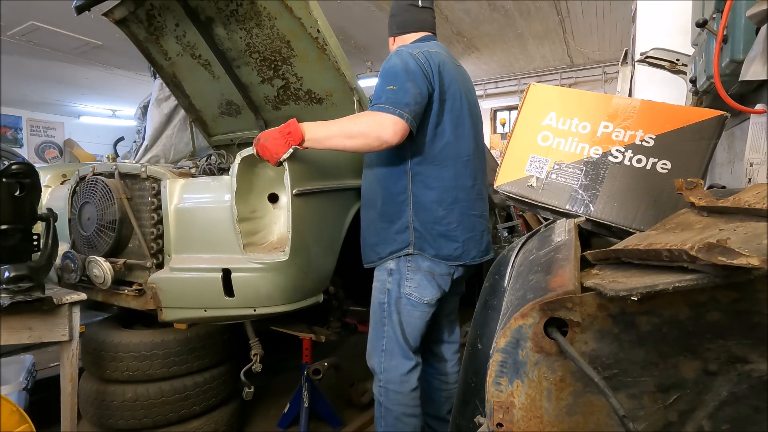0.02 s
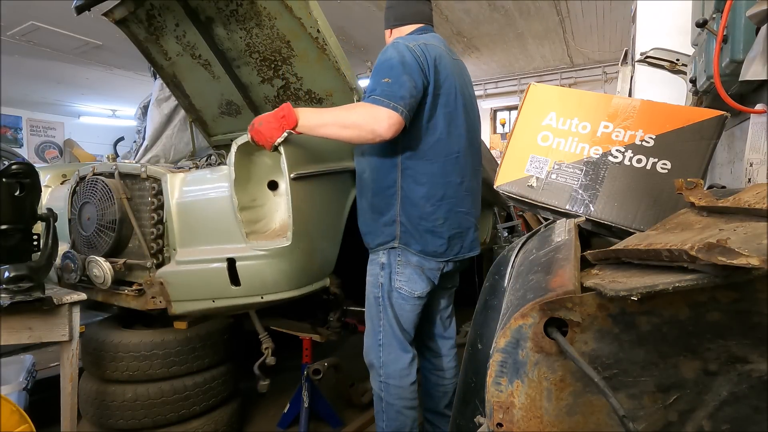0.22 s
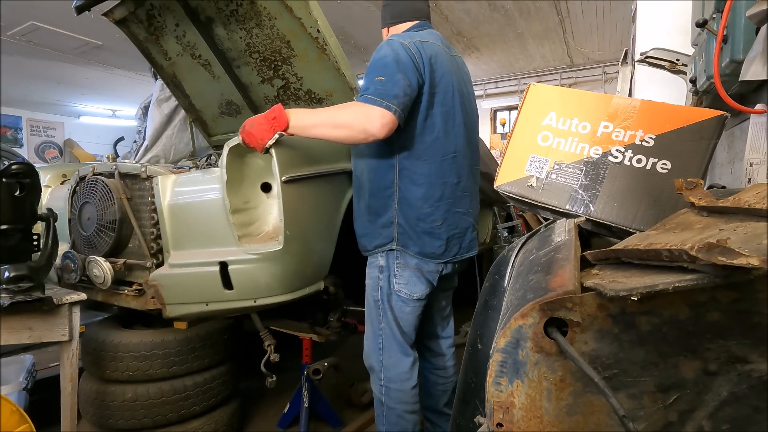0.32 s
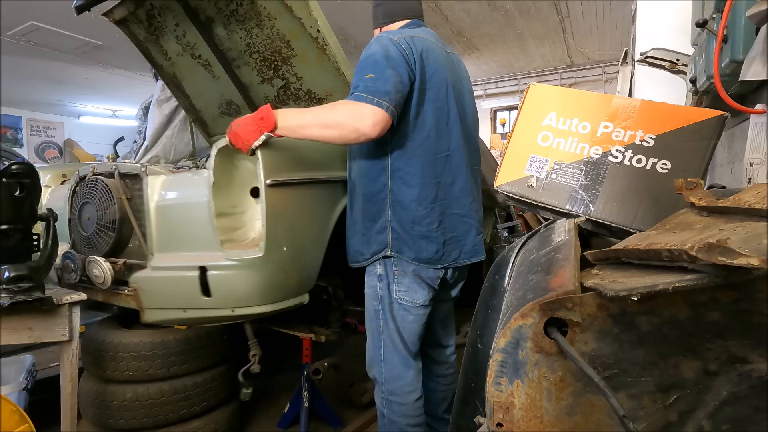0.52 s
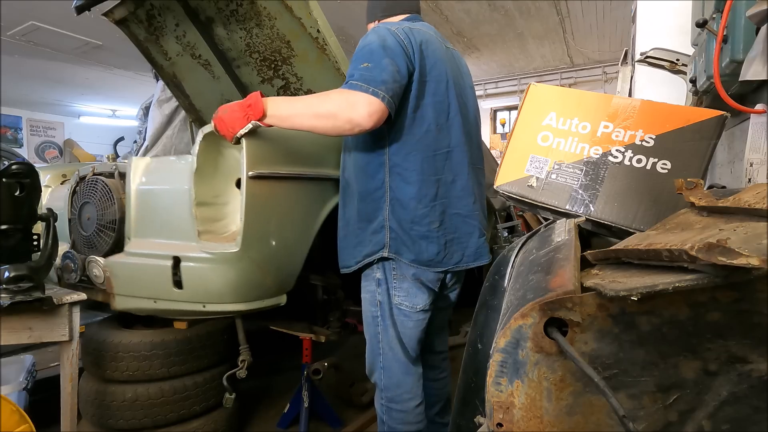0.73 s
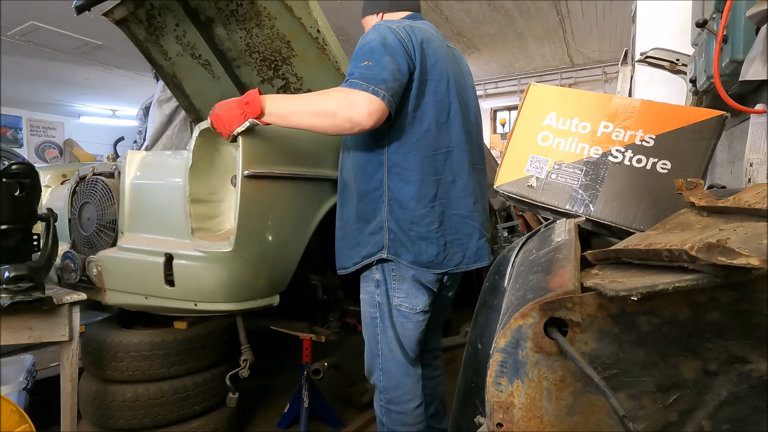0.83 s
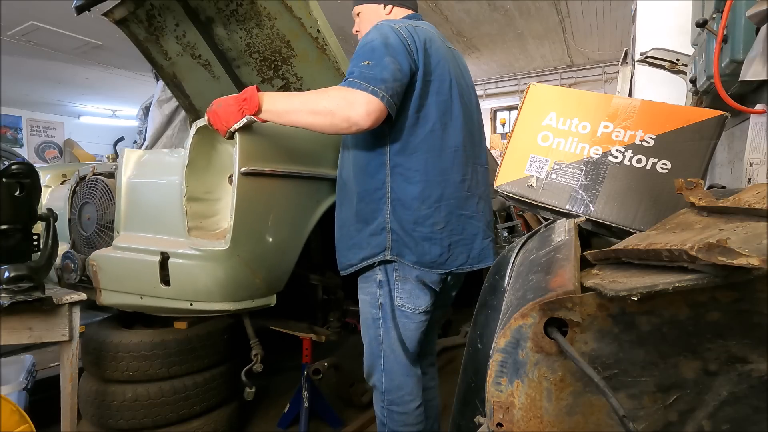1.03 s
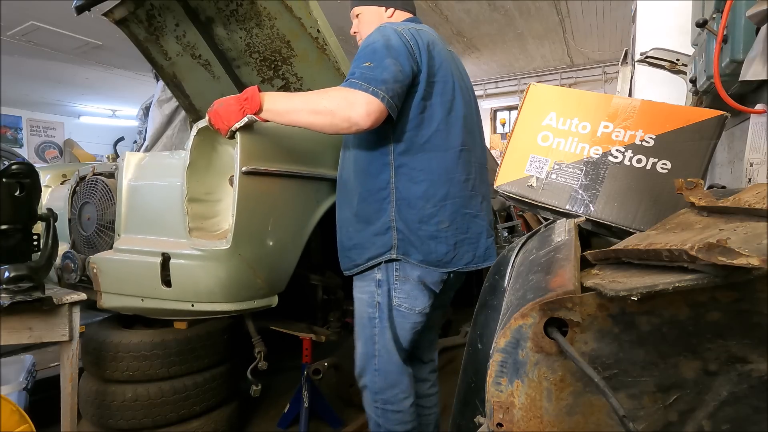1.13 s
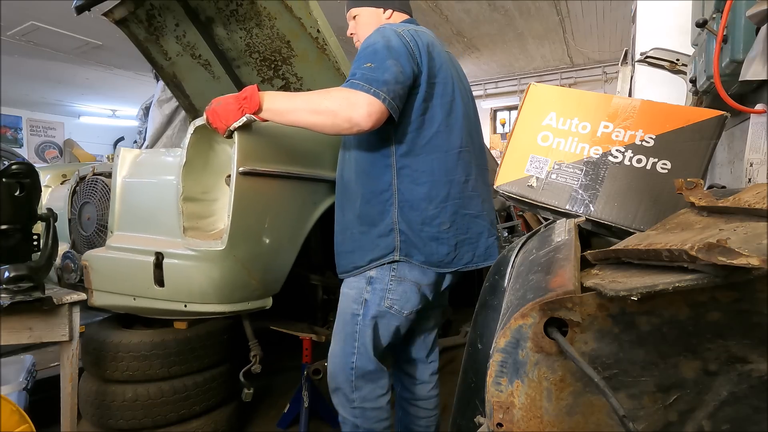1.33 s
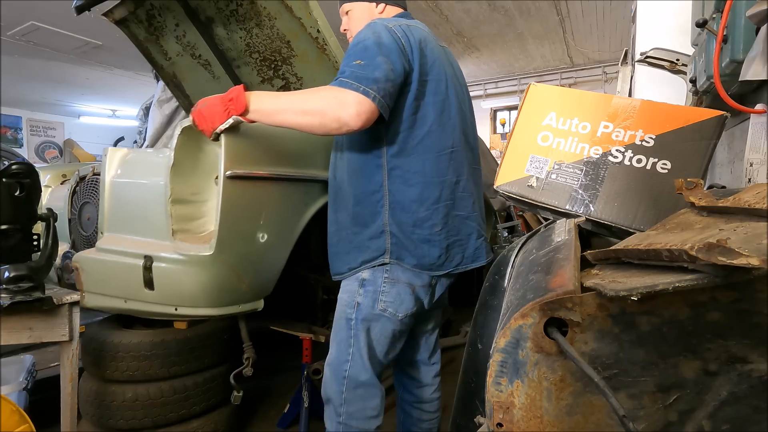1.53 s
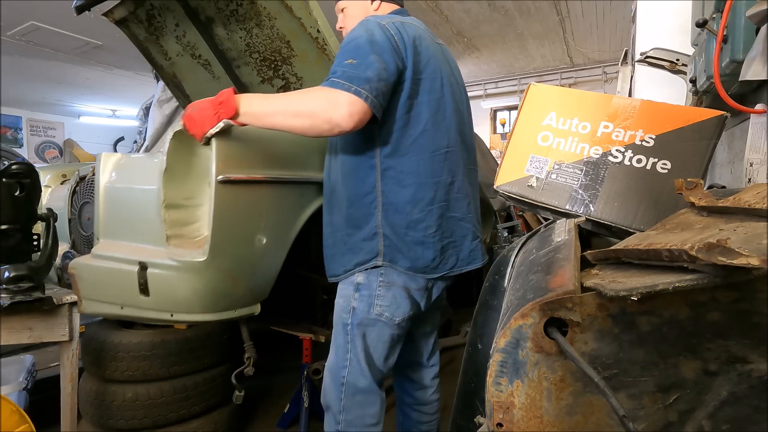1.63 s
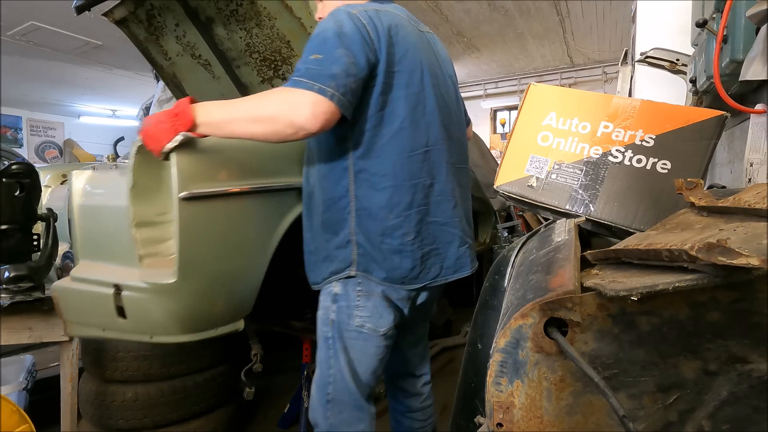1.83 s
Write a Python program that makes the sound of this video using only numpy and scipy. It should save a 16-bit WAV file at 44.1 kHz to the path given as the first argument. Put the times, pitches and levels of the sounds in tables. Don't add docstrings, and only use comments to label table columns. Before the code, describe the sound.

A loose sheet-steel car fender bangs twice, booming and ringing, then faint ticks in a garage

```python
import sys
import numpy as np
from scipy import signal
from scipy.fft import rfft, irfft, next_fast_len
from scipy.io import wavfile
from scipy.ndimage import map_coordinates

SR = 44100
rng = np.random.default_rng(int(sys.argv[2]) if len(sys.argv) > 2 else 0)


def decibels_to_gain(level_db):
    exponent = np.asarray(level_db, float) / 20
    return 10 ** exponent


def unload_audio(sound):
    columns = np.transpose(np.atleast_2d(sound))
    steps = np.round(np.clip(columns, -1, 1) * 32767)
    wavfile.write(sys.argv[1], SR, steps.astype(np.int16))


N = 83790


def unit(x):
    return x / np.sqrt(np.mean(x ** 2) + 1e-20)


def along(points, hz):
    f, value = np.transpose(points)
    return np.interp(np.log(hz + 1), np.log(f + 1), value)


def wobble(rate, size=N):
    knots = rng.standard_normal(int(size * rate / SR) + 4)
    return map_coordinates(knots, [np.arange(size) * rate / SR])


def filtered(x, response):
    n = x.shape[-1]
    m = next_fast_len(n + SR // 4)
    return irfft(rfft(x, m) * response(np.fft.rfftfreq(m, 1 / SR)), m)[..., :n]


def resonance(f, hz, width):
    return 1j * f * width / (hz * hz - f * f + 1j * f * width)


def hump(hz, octaves):
    return lambda f: resonance(f, hz, hz * octaves) ** 2


def add(track, s, x):
    x = x[max(-round(s * SR), 0):]
    part = track[max(round(s * SR), 0):][:len(x)]
    part += x[:len(part)]


# f/Hz, side over mid [ratio]
WIDE = [(100, .04), (500, 0.44), (3000, 0.59), (12000, 0.4)]


def spread(pair):
    side = filtered(pair[1], lambda hz: along(WIDE, hz))
    return np.array([pair[0] + side, pair[0] - side])


# multiple of its turning rate [-], rms level/dB
SHAFT_HUM = [(6, -58), (7, -65), (8, -66), (9, -70), (10, -69), (11, -58.5), (12, -63), (14, -68),
             (16, -71), (21, -80), (23, -84)]
# f/Hz, level/dB
AIR_COLOUR = [(25, -33.5), (75, -21), (115, -17), (150, -10.5), (300, -13.5), (410, -18), (450, -24),
              (800, -33), (6500, -41), (14500, -54)]


def heater():
    motor_hz, waver = 25.7, .001
    turns = np.cumsum(motor_hz * (1 + waver * wobble(3))) / SR
    hum = np.zeros(N)
    for multiple, db in SHAFT_HUM:
        level = np.sqrt(2) * decibels_to_gain(db + 2 * wobble(9))
        hum += level * np.sin(2 * np.pi * (multiple * turns + rng.random()))
    air = filtered(rng.standard_normal((2, N)), lambda hz: decibels_to_gain(along(AIR_COLOUR, hz)))
    air_db = -58
    return hum + decibels_to_gain(air_db) * spread(air / air[0].std())


def bending_modes(rows, grips):
    sound, t = np.zeros(N), np.arange(SR // 2) / SR
    swell_cycles, min_swell_s, longest_t60_s = 0.42, 0.0026, .7
    for s, db, hz, t60 in rows:
        swell = 1 - np.exp(-t / max(swell_cycles / hz, min_swell_s))
        loss_db = 60 * t / min(t60, longest_t60_s)
        for grip_s, rate in grips:
            if s < grip_s:
                loss_db = loss_db + rate * np.maximum(s + t - grip_s, 0)
        shake = .3 * wobble(40, size=len(t))
        add(sound, s, decibels_to_gain(db - loss_db) * swell * np.sin(2 * np.pi * hz * t + shake))
    return sound


# t/s, peak level/dB, f/Hz, t60/s
BOOMS = [(.001, -43.5, 44.6, 0.16), (0.091, -45, 45.3, 0.56), (0.159, -40, 61.4, 0.23),
         (.17, -36, 152, 0.32), (.03, -52.5, 92.9, 0.3), (.195, -44.5, 97.4, 0.34), (.21, -44.5, 50, 0.34),
         (.249, -22.5, 137, 0.41), (.26, -13, 164.1, 0.81), (.272, -23, 97.7, 1), (.275, -27.5, 343, 0.09),
         (0.269, -23, 56.4, 0.28), (.3, -21, 217.5, 0.49), (.336, -25.5, 226, 0.52),
         (0.335, -18, 103.1, 0.64), (.34, -25.5, 45, .3), (.355, -18.5, 142.9, 0.87),
         (.485, -32, 122.9, 0.17), (.39, -18.5, 69.5, 0.5), (0.399, -20.5, 228.1, 0.22),
         (.424, -23, 180.2, 0.4), (0.439, -21, 59.26, 0.14), (.49, -25.5, 224.3, 0.19),
         (.52, -33.5, 149.4, 0.28), (.54, -30.5, 97.6, 0.2), (.575, -35.5, 227.3, 0.44),
         (.6, -34.5, 48.5, 0.27), (.637, -31.5, 148.1, 0.17), (0.645, -32, 74.3, 0.24),
         (.68, -52.5, 230, 0.36), (.7, -46.5, 105, 0.22), (.715, -43, 147.7, 0.14),
         (0.738, -34, 58.7, 0.28), (.785, -47, 218, 0.21), (.79, -41, 140.6, 0.14),
         (0.801, -40.5, 99.2, 0.38), (.85, -40, 60.7, 0.3), (.855, -47, 153.4, 0.23),
         (.878, -40.5, 80.3, 0.27), (.94, -38.5, 55.9, 0.19), (1.18, -52.5, 59.4, 0.23),
         (1.323, -39.5, 66.4, 0.13), (1.324, -42, 126.5, 0.24), (1.364, -35.5, 66.4, 0.089),
         (1.79, -54.5, 75, 0.16)]
# t/s, extra loss [dB per s]
PANEL_GRIPS = [
    (.333, 250),
    (.465, 200),
]


def panel_booms():
    return bending_modes(BOOMS, PANEL_GRIPS)


def gritty_bursts(rows):
    edge, t = np.zeros(N), np.arange(SR // 4) / SR
    grit_db, grit_per_s, fall_over_rise = 2, 500, 1.855
    for s, db, rise, hz, octaves in rows:
        rough = rng.standard_normal(len(t)) * decibels_to_gain(grit_db * wobble(grit_per_s, size=len(t)))
        grit = unit(filtered(rough, hump(hz, octaves)))
        u = t / rise - 2
        shape = np.where(u < 0, np.exp(-u * u), np.exp(-u / fall_over_rise))
        add(edge, s - 2 * rise, decibels_to_gain(db) * grit * shape)
    return edge


# t/s of the peak, level/dB, rise/s, f/Hz of the centre, width/octaves
BANGS = [(.01, -53, 0.041, 1810, 4.4), (0.089, -42, 0.03, 2780, 1.7), (.084, -48, 0.016, 3700, 0.16),
         (.095, -45, 0.021, 2000, 0.38), (.085, -49.5, .015, 610, 1.2), (.124, -49.5, 0.0072, 790, .6),
         (0.139, -57.5, 0.0074, 3000, 0.89), (0.198, -41, 0.017, 990, 3.7), (0.233, -41, 0.019, 680, 3.7),
         (.249, -26, .002, 600, 1.5), (.255, -21, 0.004, 1300, .8), (0.269, -18.5, 0.006, 1530, 1.2),
         (.283, -17.5, 0.011, 2655, 3), (.29, -22, .015, 499, 2.4), (.284, -24, .008, 6980, 0.033),
         (.288, -25.5, .005, 4120, .06), (.279, -24.5, .004, 5365, 0.049), (0.313, -37, 0.0041, 6920, .06),
         (0.314, -28, 0.0082, 2850, 0.98), (0.336, -30.5, 0.0085, 2430, 1.5), (.34, -24.5, 0.023, 420, 1.6),
         (.365, -22, 0.0043, 3010, 1.4), (.371, -22, .009, 1297, 0.81), (.378, -28, 0.0078, 2180, 0.62),
         (.28, -27.5, .012, 1006, 0.42), (.385, -26.5, 0.0096, 715, 1.3), (.418, -41, 0.0061, 1230, 0.39),
         (.444, -35, .006, 1190, 0.41), (.54, -46.5, 0.032, 1300, 1), (0.481, -45.5, 0.027, 505, 1.1),
         (0.599, -55, 0.044, 3970, 1.14), (0.701, -49, 0.068, 1080, 1.84)]


def scrapes_and_bangs():
    return gritty_bursts(BANGS)


# t/s, peak level/dB, f/Hz of the centre, width/octaves
KNOCKS = [
    (.2464, -11, 1500, .5),
    (.2466, -17, 600, .7),
    (.2486, -14, 1000, .6),
    (.2595, -15, 520, .8),
    (.272, -14, 1800, .7),
    (.3755, -14, 1400, .5),
]


def knocks():
    edge, t = np.zeros(N), np.arange(SR // 4) / SR
    for s, db, hz, octaves in KNOCKS:
        blow = filtered(1. * (t == 0), hump(hz, octaves))
        add(edge, s, decibels_to_gain(db) * blow / np.abs(blow).max())
    return edge


BLOW_S = [.247, .272, .36, .385, .455]
# peak level/dB, f/Hz, t60/s
RINGS = [
    [(-25, 280, .15), (-27, 420, .2), (-25, 711, .3), (-28, 894, .2), (-26, 1550, .1), (-27, 340, .3)],
    [(-25, 335, .25), (-31, 593, .2), (-29, 500, .25), (-31, 2720, .2), (-32, 2300, .15)],
    [(-29, 397, .25), (-27, 562, .5), (-25, 1290, .12), (-29, 725, .25), (-31, 2035, .12), (-28, 1490, .08)],
    [(-26, 1165, .3), (-31, 900, .2), (-33, 500, .3)],
    [(-33, 590, .7), (-28, 285, .3), (-39, 390, .4), (-40, 495, .4), (-37, 1320, .4)],
]
# t/s, extra loss [dB per s]
RING_GRIPS = [
    (.545, 300),
]


def blow_rings():
    rows = [(s, *mode) for s, modes in zip(BLOW_S, RINGS) for mode in modes]
    return bending_modes(rows, RING_GRIPS)


# t/s, peak level/dB, f/Hz of the centre
TICKS = [(0.681, -41, 5300), (0.805, -34, 9000), (.872, -44, 8000), (0.939, -43, 9500), (1.014, -51, 7460),
         (1.057, -48, 5000), (1.093, -46, 7500), (1.178, -37, 8000), (1.245, -60, 6900), (1.289, -45, 6000),
         (1.37, -43, 9060), (1.89, -51, 3520)]


def ticks():
    edge, t = np.zeros(N), np.arange(SR // 4) / SR
    t60_s, rise_s, octaves = .008, .0004, 1.3
    for s, db, hz in TICKS:
        puff = rng.standard_normal(len(t)) * decibels_to_gain(-60 * t / t60_s) * (1 - np.exp(-t / rise_s))
        snap = filtered(puff, hump(hz, octaves))
        add(edge, s, decibels_to_gain(db) * snap / np.abs(snap).max())
    return edge


# t/s of the peak, level/dB, rise/s, f/Hz of the centre, width/octaves
RUBS = [(0.809, -45, 0.0063, 5550, 1.1), (0.844, -48.5, 0.032, 3070, 3), (0.88, -49.5, 0.012, 6000, 1.9),
        (.963, -50, 0.011, 1750, 1.43), (1.068, -53, 0.0085, 6700, 0.58), (1.118, -45.5, 0.017, 3300, 2.3),
        (1.115, -53, 0.012, 686, 1.36), (1.169, -54.5, 0.009, 7260, 2), (1.205, -55, 0.012, 1840, 1.8),
        (1.282, -57.5, 0.049, 3000, 2.2), (1.33, -49.5, .009, 600, 2.7), (1.331, -53, 0.014, 3950, 2.5),
        (1.37, -58, 0.0087, 4500, 1.9), (1.372, -52.5, .011, 810, 5.9), (1.47, -65.5, 0.052, 3500, 2.45),
        (1.808, -59.5, 0.016, 4500, 0.97), (1.8, -65.5, 0.021, 1130, 1.7), (1.849, -64, 0.046, 2000, 2.4)]


def carried_rubs():
    return gritty_bursts(RUBS)


# f/Hz, width/Hz, level/dB
STEEL = [(394.3, 16, 7), (564, 63, -2.5), (675, 17, -5), (851, 39, 4), (1170, 130, -1), (1295, 17, 0.5),
         (2000, 16, -14), (2156, 12, 5), (2938, 30, -32), (3380, 41, -16.5), (4000, 43, 0.5),
         (5220, 16, -1.5), (6100, 31, -13.5)]


def through_steel(edge):
    def response(f):
        ring = 0
        for k, (hz, width, db) in enumerate(STEEL):
            ring = ring + (-1) ** k * decibels_to_gain(db) * resonance(f, hz, width)
        return 1 + decibels_to_gain(-5) * ring
    return filtered(edge, response)


# f/Hz, side over mid [ratio]
NEAR_WIDE = [(200, .08), (600, .25), (2000, .3), (4000, .2), (12000, .4)]


def car_body_echoes(x):
    t = np.arange(SR // 50) / SR
    echo = rng.standard_normal(len(t)) * decibels_to_gain(-60 * t / .012)
    echoes = signal.fftconvolve(x, echo / np.linalg.norm(echo))[:N]
    side = filtered(echoes, lambda hz: along(NEAR_WIDE, hz))
    return np.array([x + side, x - side])


# f/Hz, t60/s
WALLS = [(80, 1), (300, 0.77), (1200, 0.51), (4000, 0.52), (8000, 0.48), (12000, 0.45)]


def garage(x):
    hz, t, noise = signal.stft(rng.standard_normal((2, SR)), SR, nperseg=512)
    fade = decibels_to_gain(-60 * t / along(WALLS, hz)[:, None])
    tail = signal.istft(noise * fade, SR, nperseg=512)[1]
    delayed = np.pad(x, (200, 0))[None]
    return spread(signal.fftconvolve(delayed, tail / np.linalg.norm(tail[0]), axes=1)[:, :N])


def scene():
    drone = heater()
    panel = panel_booms()
    edge = through_steel(scrapes_and_bangs() + knocks() + ticks() + carried_rubs())
    rings = blow_rings()
    walls = garage(decibels_to_gain(-6.5) * edge + decibels_to_gain(-12) * rings + decibels_to_gain(-15) * panel)

    def to_left(db):
        return decibels_to_gain([[db], [-db]])
    near = car_body_echoes(edge + rings)
    return near * to_left(.8) + (panel + walls) * to_left(.4) + drone * to_left(.35)


def low_pass(x):
    return signal.sosfilt(signal.butter(12, 14900, fs=SR, output="sos"), x)


# f/Hz, level/dB
MIC = [(60, 2), (6500, -3.5), (7800, -5), (12500, -8.5), (14800, -23.5), (15300, -53)]


def record(dry):
    def ports(hz):
        lag_s = 2.6e-5 * np.array([[1], [-1]])
        return decibels_to_gain(along(MIC, hz)) * np.exp(-1j * np.pi * hz * lag_s)
    return low_pass(filtered(dry, ports))


dry = scene()
out = record(dry)
unload_audio(out)
```